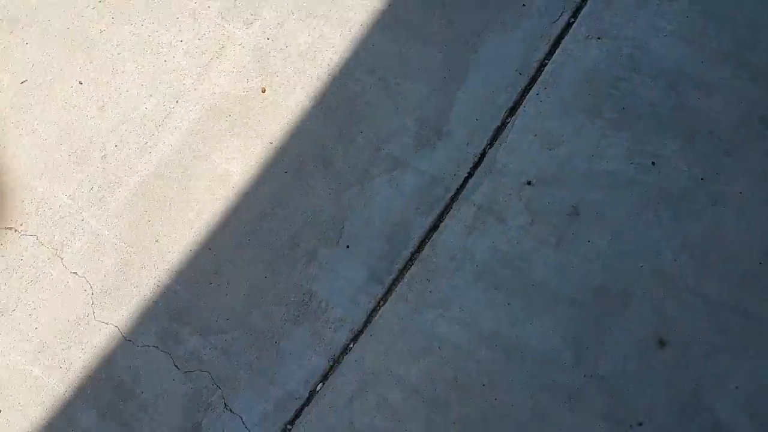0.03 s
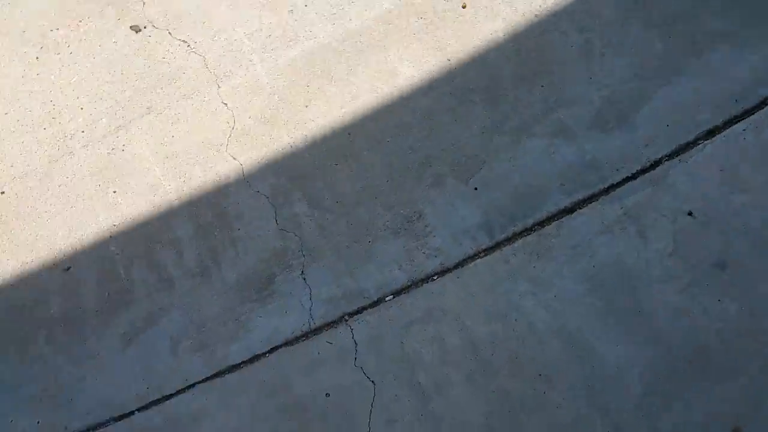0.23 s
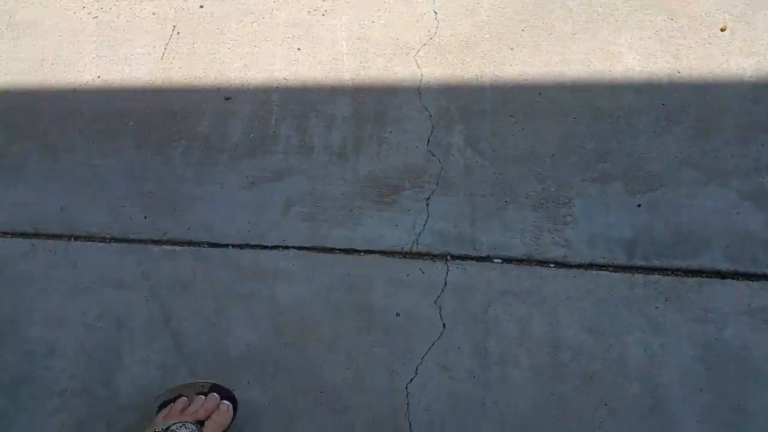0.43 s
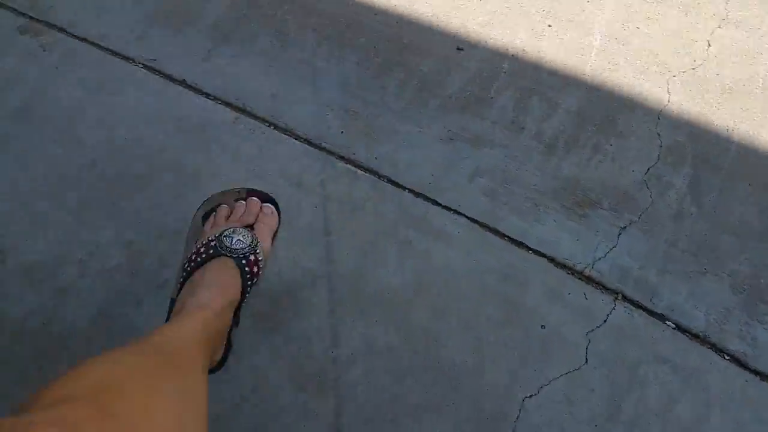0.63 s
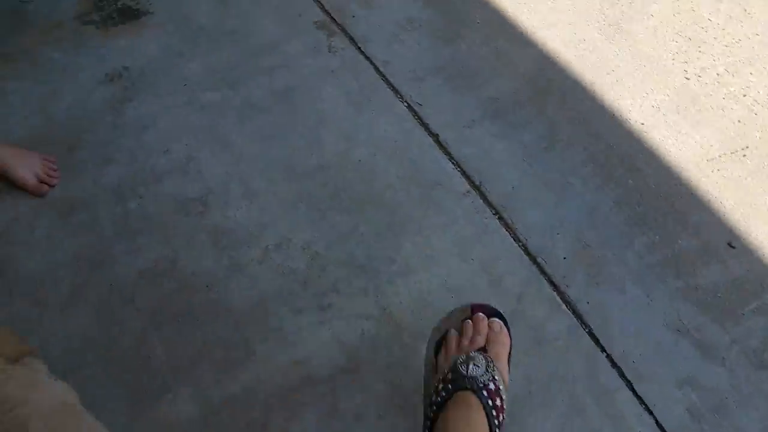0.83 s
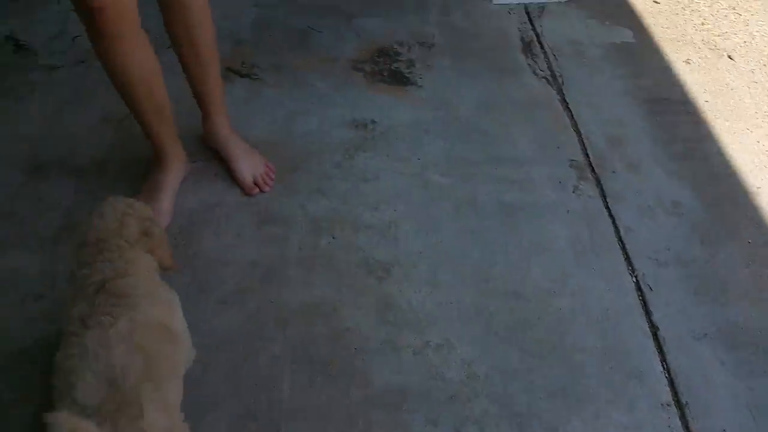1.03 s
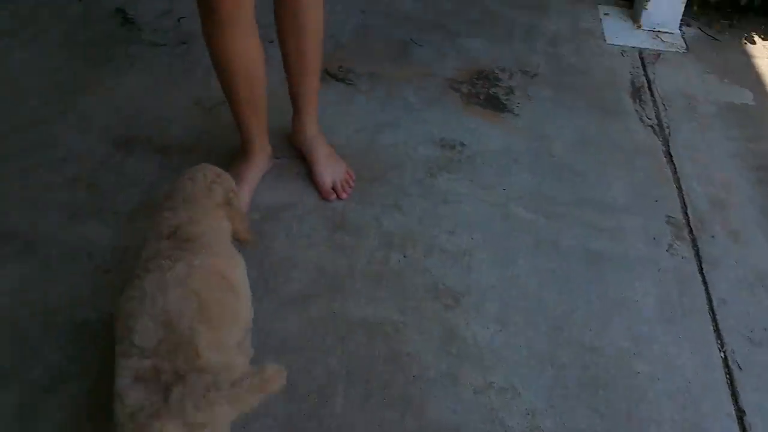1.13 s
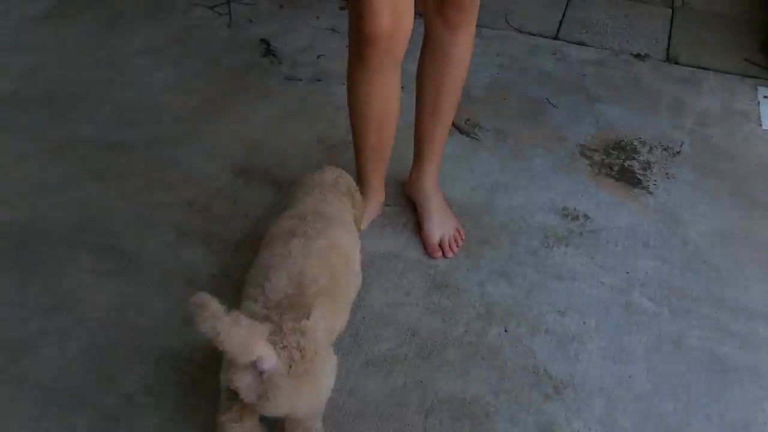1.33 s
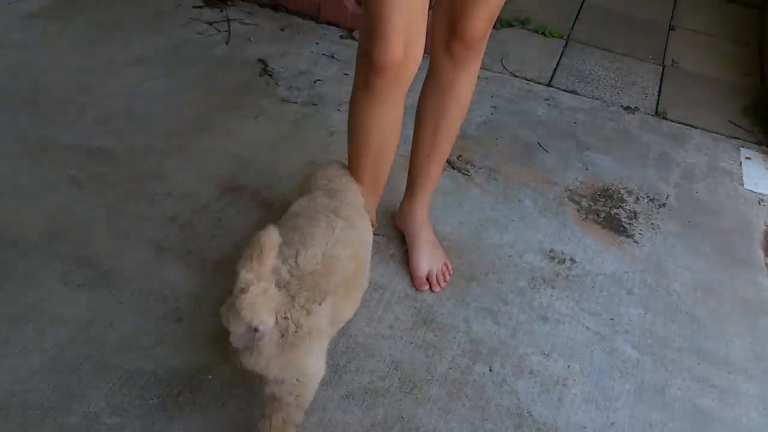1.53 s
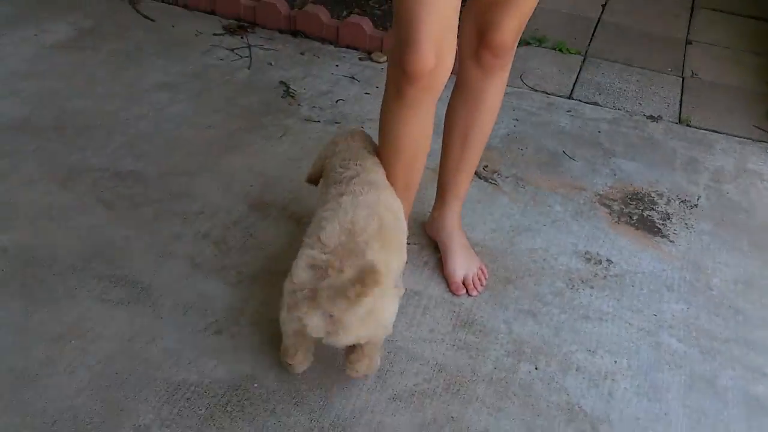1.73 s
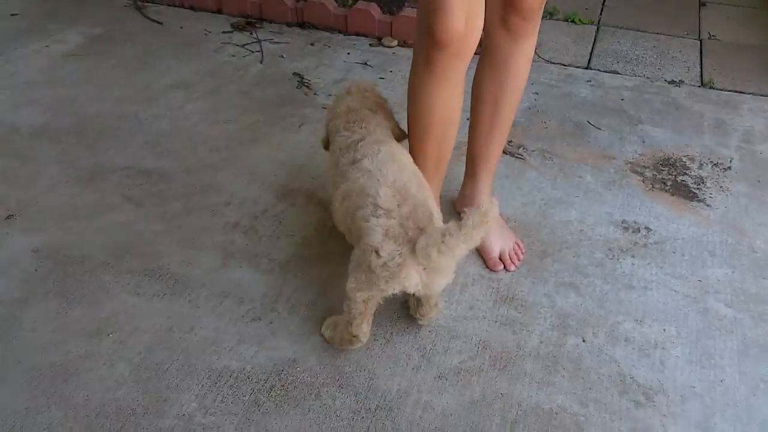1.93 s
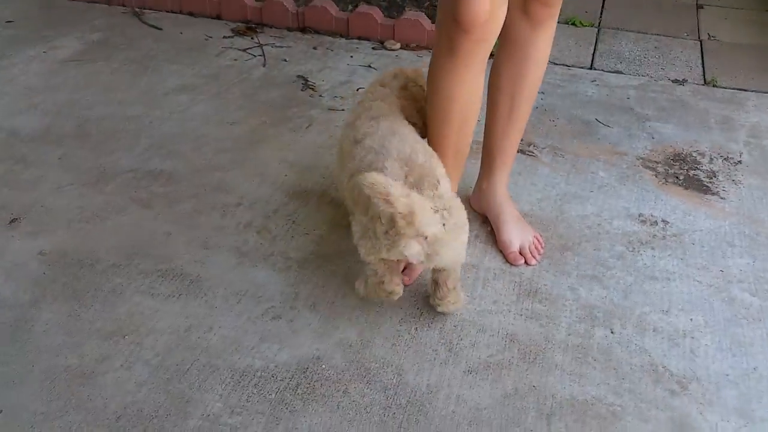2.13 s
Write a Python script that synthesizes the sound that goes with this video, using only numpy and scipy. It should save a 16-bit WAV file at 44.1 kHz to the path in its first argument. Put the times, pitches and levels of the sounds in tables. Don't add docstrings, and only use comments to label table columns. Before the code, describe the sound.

A puppy's claws click and scrape on concrete outdoors. Low fan hum and airy wash open, with faint ticks at 0.27 and 0.5 seconds. A distant dog yelps with echo around 0.85 to 1.2. The loudest sharp clack and gritty scrape comes at 1.2, smaller taps at 1.28 and 1.33, then scuffs and clicks from 1.62 to 1.83 as the fan wash fades to quiet.

```python
import sys
import numpy as np
from scipy import signal
from scipy.fft import rfft, irfft
from scipy.io import wavfile
from scipy.ndimage import uniform_filter1d

SR = 44100
rng = np.random.default_rng(int(sys.argv[2]) if len(sys.argv) > 2 else 0)


def voltage_ratio(decibels):
    exponent = np.asarray(decibels, float) / 20
    return 10 ** exponent


def bounce(signal):
    frames = np.transpose(np.atleast_2d(signal))
    limited = np.clip(frames, -1, 1)
    pcm = np.round(limited * 32767).astype(np.int16)
    wavfile.write(sys.argv[1], SR, pcm)


N = 96314

# (frequency [Hz], level per Hz [dB])
NEAR_SPECTRUM = [(25, -13.5), (120, -1.5), (300, -6), (900, -14.5), (2500, -20), (4000, -30.5), (7300, -37),
                 (8600, -49)]
# (frequency [Hz], level per Hz [dB])
AWAY_SPECTRUM = [(25, -25.5), (115, 3), (300, -8), (700, -12.5), (2000, -14), (3500, -25), (7300, -27),
                 (8600, -63)]
# (time [s], share facing the fan [0-1])
FACING_FAN = [
    (0, 0.9),
    (.35, 0.8),
    (.7, 0.72),
    (1, 0.97),
    (1.3, 0.76),
    (1.55, 0.42),
    (1.75, 0.34),
    (2.18, 0.1),
]
# (frequency [Hz], left-right likeness [-1 to 1])
COHERENCE = [(40, 0.88), (130, 0.74), (300, 1), (650, 0.53), (1500, 0.0), (4000, 0.1)]
# (frequency [Hz], left-right level [dB])
BALANCE = [(60, 0), (240, 0), (950, 1), (3770, -4), (15000, -9)]
# (time [s], level [dB])
BLADE_LEVEL = [
    (0, -43.5),
    (.35, -46),
    (.55, -51.5),
    (.72, -55),
    (.85, -77),
    (2.18, -57),
]
# (middle [s], length [s], level [dB], centre [Hz], left-right [dB])
SWISH_EVENTS = [(.08, 0.021, -67.5, 4130, -4), (.17, .03, -67, 6340, -5), (.188, 0.018, -56.5, 5840, -13),
                (.415, 0.032, -61.5, 5250, -13), (.455, 0.048, -59.5, 5900, -13.5),
                (.55, 0.063, -69, 7060, 7), (1.14, 0.076, -58, 3370, -11), (1.213, 0.041, -59.5, 6940, -21),
                (1.14, 0.076, -63.5, 8900, -9), (1.262, .04, -56, 3600, -7), (1.41, .05, -60, 3430, -4),
                (1.33, 0.26, -66.5, 8900, -11.5), (1.665, 0.037, -58.5, 4950, -10),
                (1.71, 0.063, -57.5, 2470, -2), (1.803, 0.019, -63.5, 11000, 11),
                (1.825, 0.055, -51.5, 2450, 1)]
# (middle [s], length [s], level [dB], centre [Hz], left-right [dB])
BRUSH_EVENTS = [
    (.186, 0.018, -67, 11500, -4),
    (.45, .08, -69.5, 12500, -2),
    (.517, 0.022, -67, 8000, 9),
    (.555, .05, -73, 10500, 3),
    (1.14, .07, -71, 12100, -4),
    (1.245, .07, -61, 6500, -14),
    (1.3, 0.07, -67, 6430, -8),
    (1.64, 0.047, -72, 12000, 2),
    (1.638, .02, -50, 4230, 0),
    (1.8, .04, -66, 12500, 5),
]
# (middle [s], length [s], level [dB], resonance [Hz], left-right [dB])
SCUFF_EVENTS = [(.188, 0.01, -56.5, 2190, 1), (.452, 0.028, -61, 2660, 11), (1.1965, 0.011, -40, 2670, -1),
                (1.213, 0.022, -45, 2485, -3), (1.232, 0.021, -53, 2530, 4), (1.355, 0.06, -57.5, 2510, 7),
                (1.615, 0.024, -55, 2380, 6), (1.639, 0.016, -42.5, 2430, -2),
                (1.662, 0.019, -50.5, 2450, 3), (1.765, .02, -48.5, 2370, 5), (1.777, .012, -40.5, 2280, 0),
                (1.786, 0.019, -42.5, 2160, 4.5)]
# (frequency [Hz], level per Hz [dB])
GRIT_SPECTRUM = [(800, -10), (1700, -4.5), (2400, -3.5), (3400, -7.5), (5000, -11.5), (7200, -15),
                 (8600, -26.5), (16000, -39)]
# (frequency [Hz], gain [dB])
PORT_RESPONSE = [(5000, -3), (7300, 0), (8700, -11), (16000, -13)]
# (time [s], peak [dB], ring [Hz], tick [dB], left-right [dB])
TAP_EVENTS = [(.2654, -35, 6300, -42, -8), (.2657, -38, 4900, -42, -8), (.266, -35, 2300, -40, -5),
              (.5101, -46, 8000, -20, 8), (.514, -44, 7500, -20, 8), (.5154, -42, 6500, -20, 8),
              (.5167, -31, 8600, -14, 12), (.5172, -34, 5800, -30, 8), (.5171, -40, 2400, -40, 4),
              (1.0862, -37.5, 2600, -27, -26.5), (1.20442, -12.3, 4010, -13, -16),
              (1.20465, -14.3, 2340, -40, -26), (1.20459, -8, 9000, -36, -4),
              (1.20483, -12.5, 1735, -50, -19), (1.20501, -8.8, 2140, -50, 0), (1.2757, -30, 2420, -30, 0),
              (1.2757, -38, 7000, -30, -6), (1.2779, -19.1, 3700, -19, -13),
              (1.27795, -29.5, 1140, -50, -7), (1.27765, -29.6, 2220, -50, -18),
              (1.3277, -23.2, 1990, -24, -15), (1.32795, -18.6, 1140, -56, -13),
              (1.32815, -35, 5220, -20, -14), (1.7303, -44, 3200, -20, -10),
              (1.73413, -21.1, 2860, -34, -11), (1.73398, -26, 1225, -50, -15), (1.772, -41, 9600, -10, 1),
              (1.808, -38, 13000, -3, 6), (1.8285, -29, 6600, -40, 8), (1.828, -38, 1300, -40, 3)]
# (time [s], peak [dB], frequency [Hz])
PAD_EVENTS = [
    (1.1505, -31, 100),
    (1.322, -33, 120),
    (1.3275, -30, 250),
    (1.43, -41, 280),
    (1.3225, -36, 420),
    (1.3273, -31, 500),
    (.266, -38, 130),
    (.705, -38, 85),
]
# (start [s], length [s], level [dB], first pitch [Hz], last pitch [Hz])
YELP_EVENTS = [
    (.84, .06, -42, 546.3, 536),
    (.88, 0.13, -42, 464.3, 453),
    (.85, 0.13, -48, 411.7, 425),
    (0.884, 0.12, -49, 645.7, 632.7),
    (.91, .08, -48.5, 553.2, 563.3),
    (.99, .095, -48, 453.7, 431.7),
    (1.1, .09, -50.5, 662, 684),
]
# (frequency [Hz], level per Hz [dB])
THROAT_SPECTRUM = [(440, 0.5), (650, -2.5), (920, 0.5), (1350, 1), (1580, -6), (1820, -3), (2400, -13),
                   (3400, -32)]

NEAR_DB, AWAY_DB, HISS_DB = -42.5, -53, -71.5
HUM_HZ, HUM_WAVER_DB = 138.8, 1.2
MAINS_HZ, MAINS_WIDTH_HZ, MAINS_DB = 115.2, 9.4, -56.5
GUST_HZ, GUST_DB, GUST_PAN_DB = 69.6, -59, -4
CLAW_Q, SWISH_Q, BRUSH_Q = 5, 2.2, 2.8
CLAW_HISS, SWISH_HISS = .5, 2.5
GRIT_DB, SLIPS_PER_S, SLIP_SPREAD_DB = 1.5, 1500, 2.5
TAP_CYCLES, TAP_SAG = 2.1, .2
TICK_S, TICK_HZ = 0.00014, 9740
EAR_LAG_S, SHADE_HZ = .0003, 7500
PAD_CYCLES = 2.0
YELP_ROUGH, YELP_WOBBLE = .56, .02
YARD_T60_S, YARD_DB, YARD_DIRECT_DB, PAW_ECHO_DB = .55, -1, 1.5, -28.0
EDGE_HZ = 15950


def evened(x):
    return x / np.sqrt(np.mean(x ** 2) + 1e-20)


def read(points, hz):
    f, value = np.transpose(points)
    return np.interp(np.log(hz + 1), np.log(f + 1), value)


def curve(points, t):
    return np.interp(t, *np.transpose(points))


def add(mix, s, sound):
    part = mix[:, max(round(s * SR), 0):][:, :sound.shape[1]]
    part += sound[:, :part.shape[1]]


def sides(db):
    return voltage_ratio(np.array([[db / 2], [-db / 2]]))


def colour(x, points):
    n = x.shape[-1]
    gain = voltage_ratio(read(points, np.fft.rfftfreq(n, 1 / SR)))
    return irfft(rfft(x) * gain, n)


def resonate(x, hz, width):
    r = np.exp(-np.pi * width / SR)
    poles = [2, -4 * r * np.cos(2 * np.pi * hz / SR), 2 * r * r]
    return signal.lfilter([1 - r * r, 0, r * r - 1], poles, x)


def slow(rate):
    noise = rng.standard_normal(N + SR)
    wander = signal.lfilter([1], [1, -np.exp(-2 * np.pi * rate / SR)], noise, axis=0)
    return evened(wander[SR:])


def air():
    frames, hz = N // 256 + 5, np.fft.rfftfreq(1024, 1 / SR)
    a, b, c, d, patches = rng.standard_normal((frames, 513, 5)).T
    patches = uniform_filter1d(patches, size=14, axis=0)
    patches = evened(uniform_filter1d(patches, size=10, axis=1))
    share = np.clip(curve(FACING_FAN, np.arange(frames) * 256 / SR), 0, 1.3)
    near, away = read(NEAR_SPECTRUM, hz), read(AWAY_SPECTRUM, hz)
    near = near + NEAR_DB - 10 * np.log10(np.sum(voltage_ratio(2 * near)))
    away = away + AWAY_DB - 10 * np.log10(np.sum(voltage_ratio(2 * away)))
    same = np.clip(read(COHERENCE, hz), -1, 1)[:, None]
    left = a + 1j * b
    right = same * left + np.sqrt(1 - same ** 2) * (c + 1j * d)
    z = np.array([left, right])
    z *= voltage_ratio(np.outer(near, share) + np.outer(away, 1 - share) + 1.23 * patches)
    z *= voltage_ratio(np.outer([.5, -.5], read(BALANCE, hz)))[:, :, None]
    return 1.113 * signal.istft(z, nperseg=1024, noverlap=768)[1][:, :N]


def fan():
    t = np.arange(N) / SR
    hz = HUM_HZ + 0.44 * uniform_filter1d(slow(1.0), size=2000)
    blade = np.sin(2 * np.pi * np.cumsum(hz) / SR)
    waver_db = HUM_WAVER_DB * uniform_filter1d(slow(3.4), size=600)
    blade *= np.sqrt(2) * voltage_ratio(curve(BLADE_LEVEL, t) + waver_db)
    motor = resonate(rng.standard_normal(N), MAINS_HZ, MAINS_WIDTH_HZ)
    motor = resonate(motor, MAINS_HZ, 3 * MAINS_WIDTH_HZ)
    return sides(-1.6) * (blade + voltage_ratio(MAINS_DB) * evened(motor))


def gusts():
    low = signal.butter(2, GUST_HZ, fs=SR, output="sos")
    high = signal.butter(2, 25, "high", fs=SR, output="sos")
    rumble = signal.sosfilt(low, rng.standard_normal((2, N)))
    return voltage_ratio(GUST_DB) * sides(GUST_PAN_DB) * evened(signal.sosfilt(high, rumble))


def swish(*row):
    return scuff(*row, sharp=SWISH_Q, hiss=SWISH_HISS)


def yard(x):
    taps = np.zeros((2, SR // 2))
    at = np.arange(300, SR // 2 - 40, 40)
    when = at + rng.integers(0, 40, (2, len(at)))
    np.put_along_axis(taps, when, rng.choice([-1., 1.], (2, len(at))), 1)
    hz, t, z = signal.stft(taps, SR, nperseg=256)
    decay = voltage_ratio(-60 * t * (1 + hz[:, None] / 1500) / YARD_T60_S)
    tail = signal.istft(z * decay, SR, nperseg=256)[1]
    return signal.fftconvolve(x, tail / np.linalg.norm(tail[0]), axes=1)[:, :N]


def brush(s, length, db, hz, pan_db):
    n = round(2 * length * SR)
    noise = rng.standard_normal((2, 9000))[:, :n]
    hiss = resonate(noise, hz, hz / BRUSH_Q)
    hiss = evened(resonate(hiss, hz, hz / BRUSH_Q))
    stroke = np.exp(-(np.linspace(-1, 1, n) / 0.62) ** 2)
    return s - length, voltage_ratio(db) * sides(pan_db) * stroke * hiss


def scuff(s, length, db, hz, pan_db, sharp=CLAW_Q, hiss=CLAW_HISS):
    n = round(2 * length * SR)
    draw = rng.random((2, 24000))[:, :n]
    noise = rng.standard_normal((3, 24000))[:, :n]
    slipping = draw[0] < SLIPS_PER_S / SR
    slips = slipping * noise[0] * voltage_ratio(-SLIP_SPREAD_DB * np.log(draw[1] + 0.018))
    drive = evened(slips) + hiss * noise[1:]
    claw = resonate(resonate(drive, hz, hz / sharp), hz, 2 * hz / sharp)
    claw = evened(colour(claw, PORT_RESPONSE))
    grit = evened(colour(drive + noise[1:], GRIT_SPECTRUM))
    stroke = np.exp(-(np.linspace(-1, 1, n) / 0.5) ** 2)
    return s - length, voltage_ratio(db) * sides(pan_db) * stroke * (claw + voltage_ratio(GRIT_DB) * grit)


def tap(s, db, hz, tick_db, pan_db):
    u = np.arange(600) / SR * hz / TAP_CYCLES
    phase = 2 * np.pi * TAP_CYCLES * u * (1 - TAP_SAG * np.tanh(u / 2))
    ring = -np.sin(phase) * np.exp(-2.1 * u) * (1 - np.exp(-9 * u)) ** 2
    ring = signal.sosfilt(signal.butter(2, hz / 5, "high", fs=SR, output="sos"), ring)
    tick = rng.standard_normal(600) * np.exp(-np.arange(600) / SR / TICK_S)
    near = 1.6 * ring + voltage_ratio(tick_db) * 2 * resonate(tick, TICK_HZ, 5000)
    r = np.exp(-2 * np.pi * SHADE_HZ / SR)
    far = signal.lfilter([(1 - r) ** 2], [1, -2 * r, r * r], near)
    far = np.roll(far, round(EAR_LAG_S * SR))
    pair = [far, near] if pan_db < 0 else [near, far]
    return s, voltage_ratio(db) * sides(pan_db) * np.array(pair)


def pad(s, db, hz):
    u = np.arange(0, PAD_CYCLES / hz, 1 / SR) * hz
    push = np.sin(np.pi * u / PAD_CYCLES) ** 2
    return s, voltage_ratio(db) * sides(-3) * np.sin(2 * np.pi * u) * push


def yelp(s, length, db, first_hz, last_hz):
    n = round(length * SR)
    u, noise = np.arange(n) / n, rng.standard_normal((2, 10000))[:, :n]
    glide = last_hz + (first_hz - last_hz) * (1 - u) ** 2
    wobble = evened(uniform_filter1d(noise[0], size=300))
    turns = np.cumsum(glide * (1 + YELP_WOBBLE * wobble)) / SR
    folds = sum(np.cos(2 * np.pi * k * turns) for k in range(1, 13))
    puffs = (0.39 + np.exp(-(turns % 1) / 0.17)) * noise[1]
    drive = (1 - YELP_ROUGH) * evened(folds) + YELP_ROUGH * evened(puffs)
    throat = [(200, -27)] + THROAT_SPECTRUM + [(4600, -41), (6000, -22), (7600, -38), (9000, -50)]
    voiced = evened(colour(drive, throat))
    swell = np.minimum(np.minimum(u * length / .035, (1 - u) / .35), 1)
    return s, voltage_ratio(db) * swell[None] * voiced


def scene():
    paws, dog = np.zeros((2, N)), np.zeros((1, N))
    mix = air() + fan()
    contacts = ((TAP_EVENTS, tap), (SCUFF_EVENTS, scuff), (SWISH_EVENTS, swish),
                (PAD_EVENTS, pad), (BRUSH_EVENTS, brush))
    for rows, source in contacts:
        for row in rows:
            add(paws, *source(*row))
    for row in YELP_EVENTS:
        add(dog, *yelp(*row))
    near = paws + voltage_ratio(PAW_ECHO_DB) * yard(paws)
    far = voltage_ratio(YARD_DIRECT_DB) * dog + voltage_ratio(YARD_DB) * yard(dog)
    return mix + near + far + gusts()


def roll_off(x):
    return signal.sosfilt(signal.butter(12, 16510, fs=SR, output="sos"), x)


def record(dry):
    hiss = voltage_ratio(HISS_DB) * rng.standard_normal(dry.shape)
    low_pass = signal.firwin(511, EDGE_HZ, window=("kaiser", 9), fs=SR)
    mix = signal.oaconvolve(dry + hiss, low_pass[None], "same")
    return roll_off(mix)


dry = scene()
out = record(dry)
bounce(out)
```